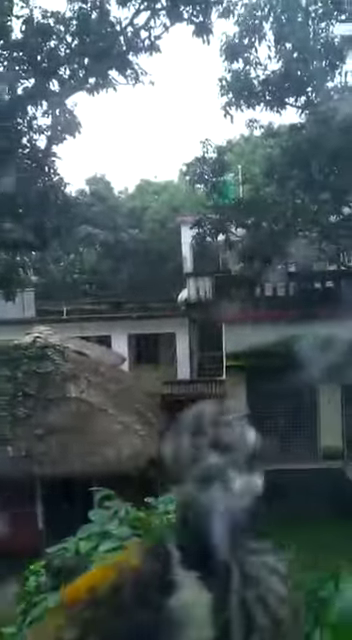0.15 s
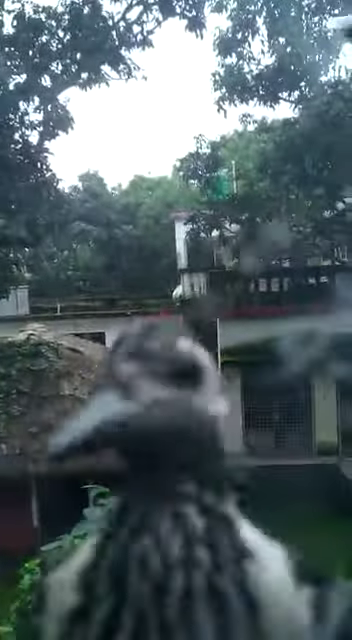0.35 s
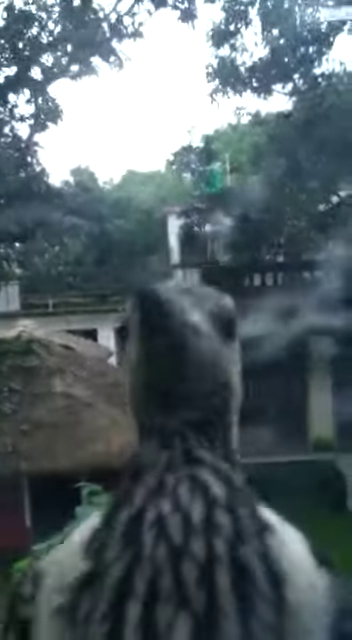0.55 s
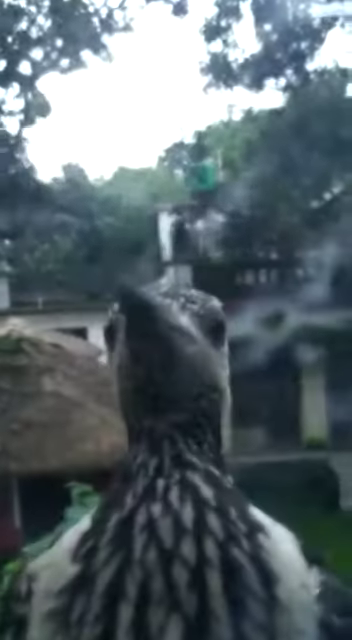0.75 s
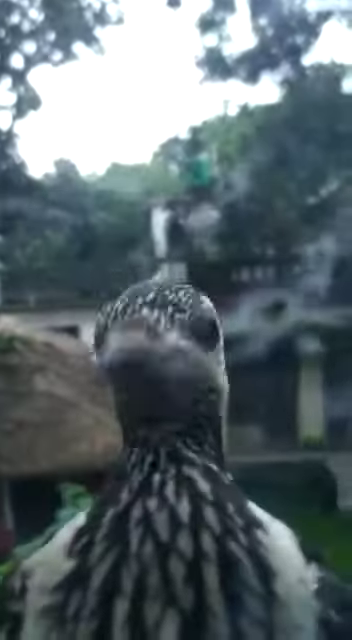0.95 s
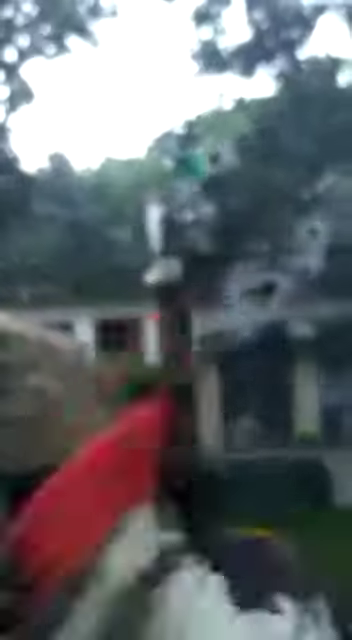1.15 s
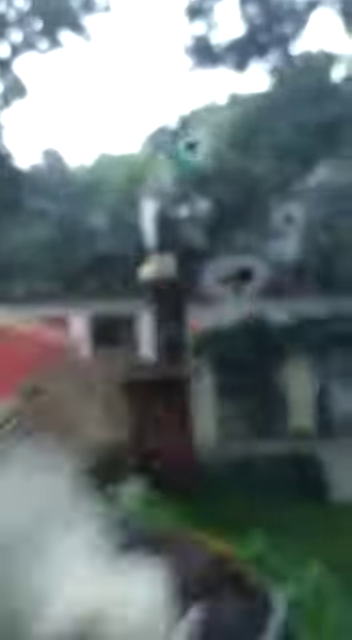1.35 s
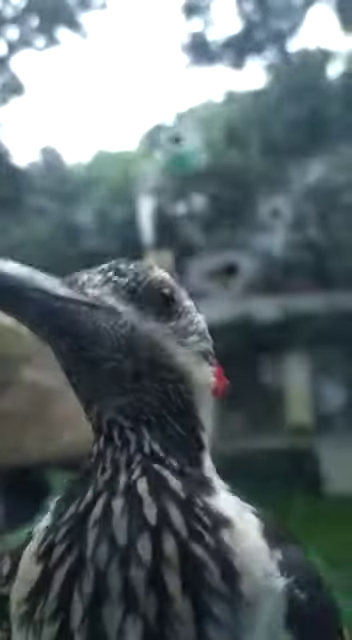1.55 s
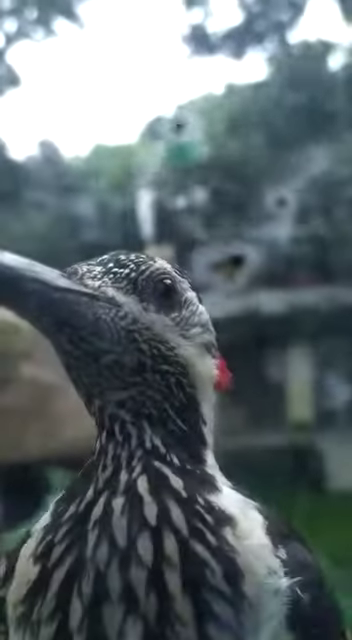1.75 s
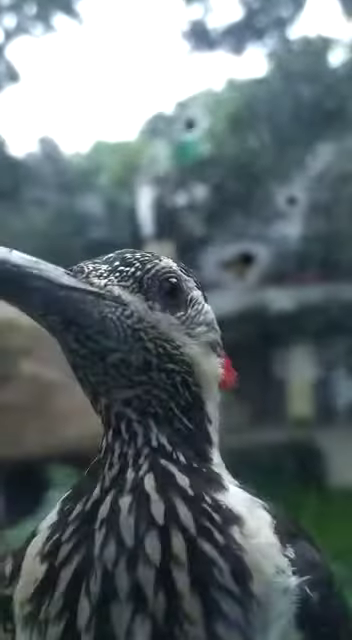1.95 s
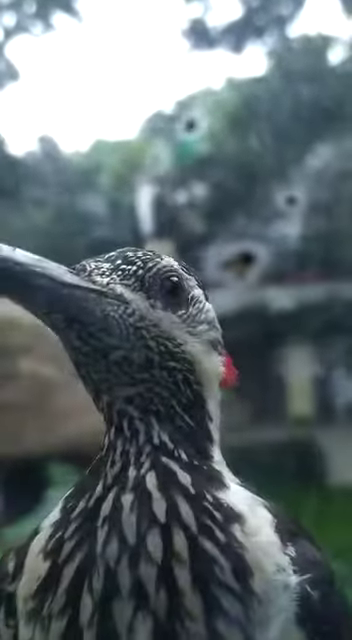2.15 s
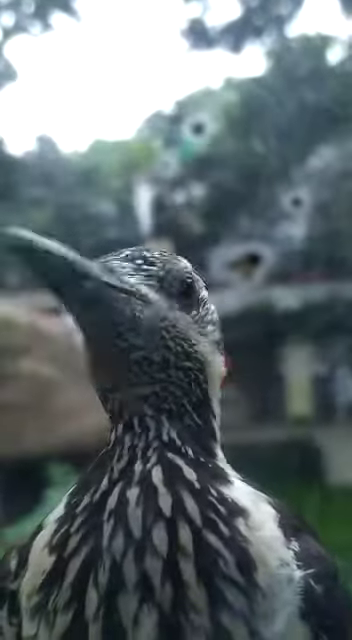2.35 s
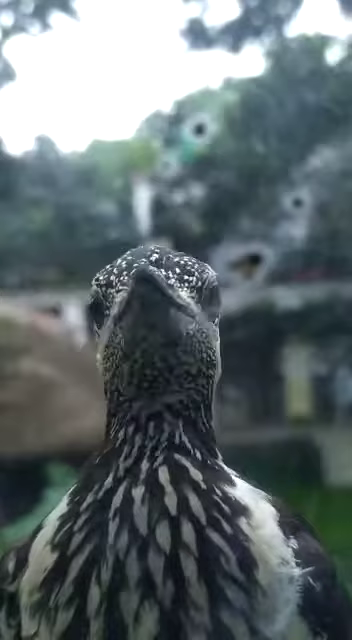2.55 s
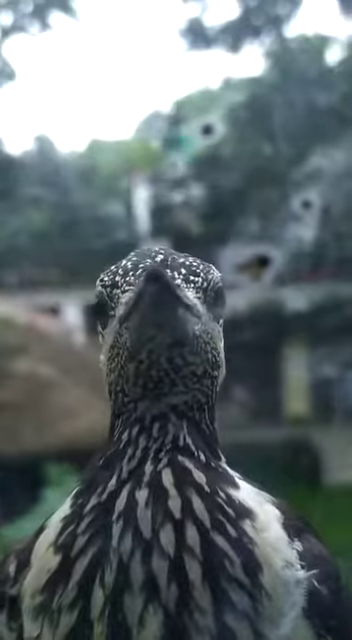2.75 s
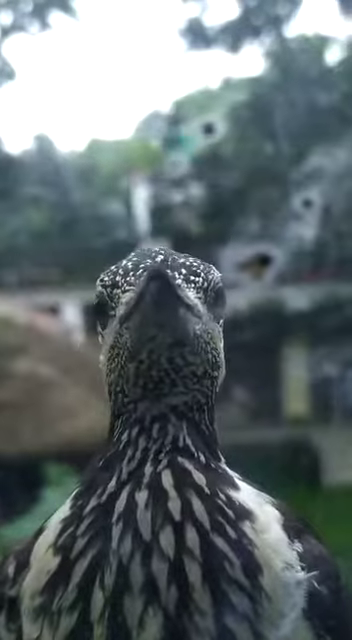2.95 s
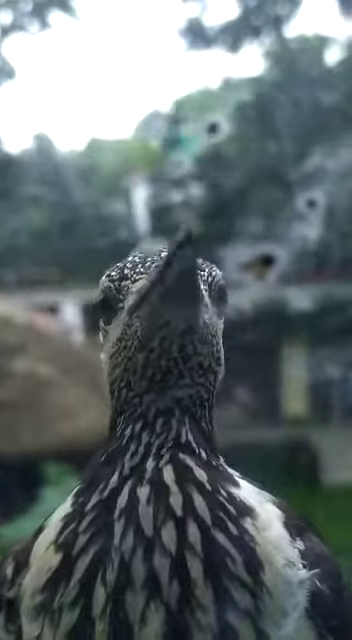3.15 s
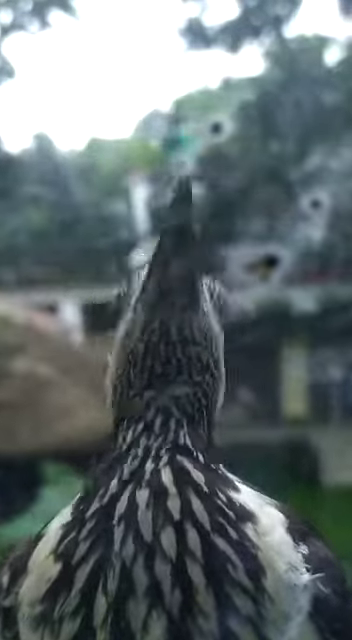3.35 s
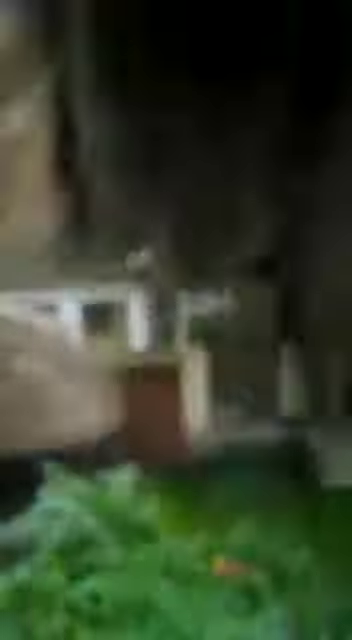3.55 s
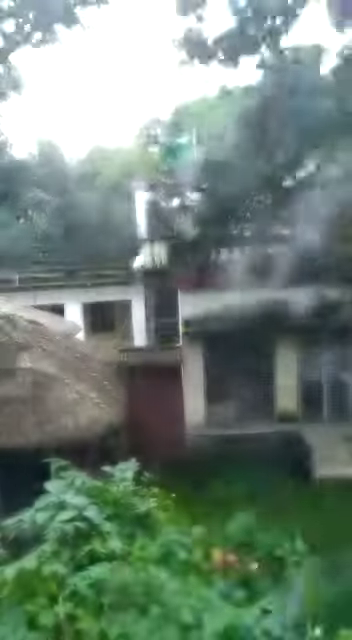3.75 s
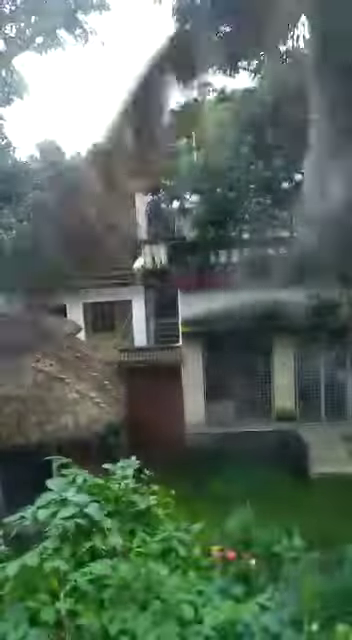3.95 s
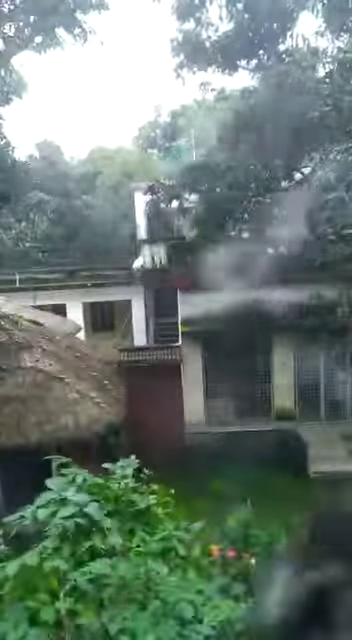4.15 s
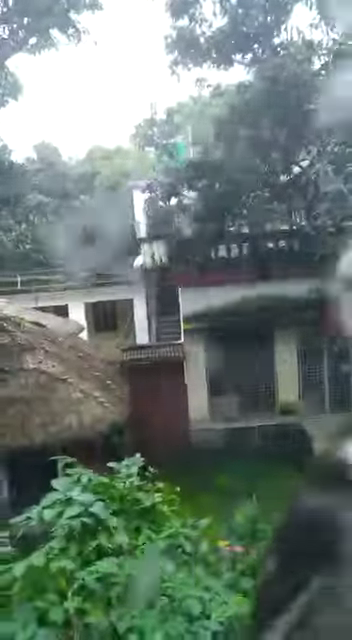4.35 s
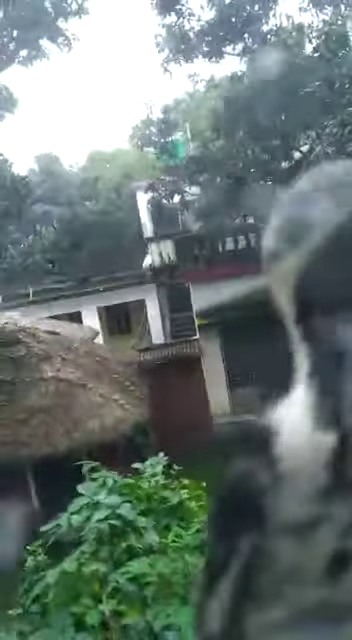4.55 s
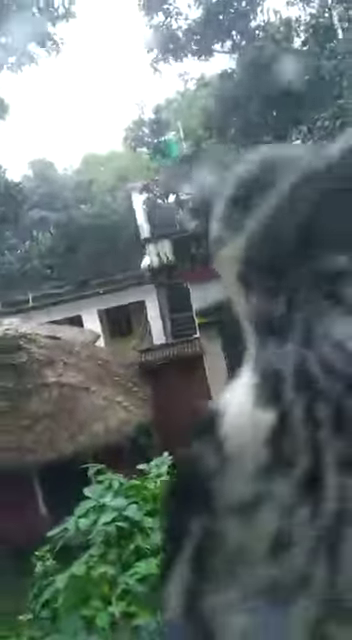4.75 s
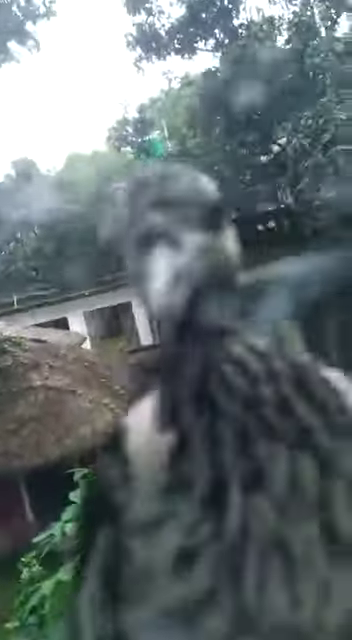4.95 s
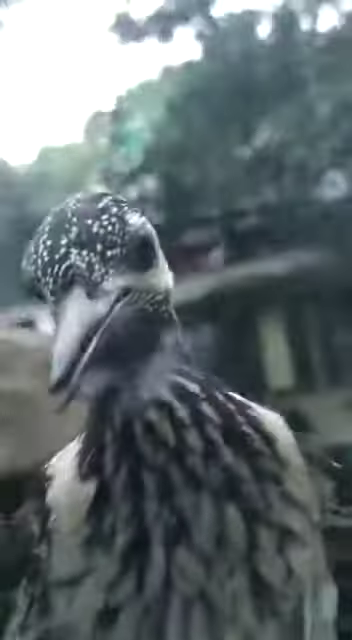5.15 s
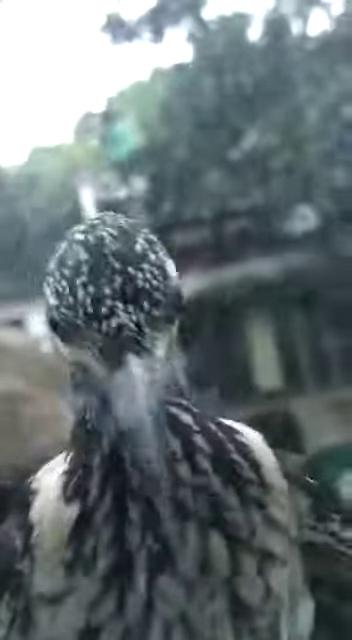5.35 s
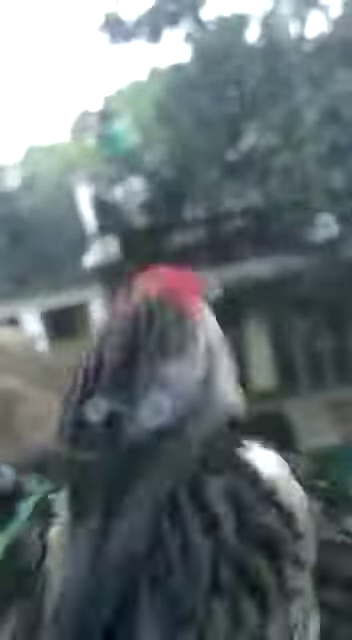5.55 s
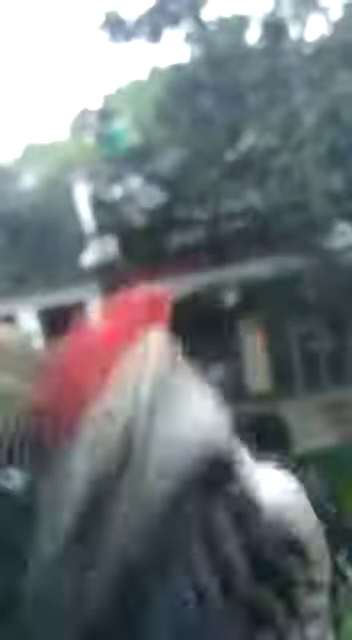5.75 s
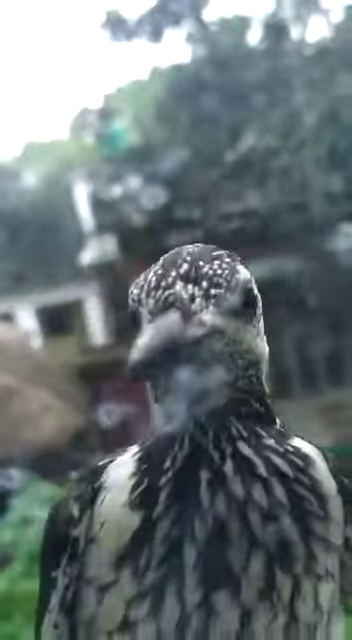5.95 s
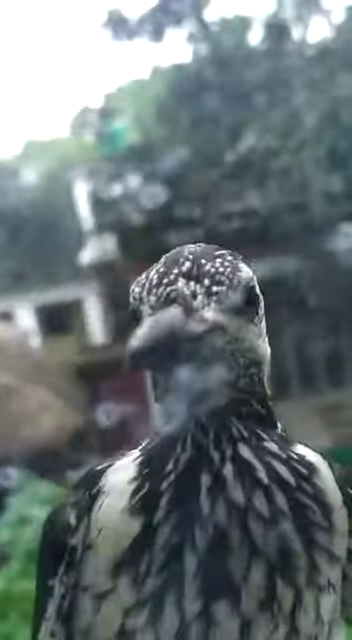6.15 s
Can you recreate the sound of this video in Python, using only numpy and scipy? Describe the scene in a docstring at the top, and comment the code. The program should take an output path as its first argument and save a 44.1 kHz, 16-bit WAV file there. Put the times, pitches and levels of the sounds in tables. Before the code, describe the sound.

Close to a window, heard from inside a bare, reverberant room, a woodpecker raps the glass: a quick pair amid claw scratches, a softer tap, then another firm burst. A quiet stretch follows with faint insects and low hum. Then wings brush, claws scrabble, and two of the loudest knocks ring out before faint scratching and a last light pair.

```python
"""A woodpecker outside a window knocks on the glass and scrabbles with claws and wings on sill and frame.
Close by, decaying modes make the pane ring, a low sine thumps the frame and noise bursts make crack and claws.
The bare room behind the microphones answers with tails of sparse random taps.
From the yard come steady coloured noise for air, insects and rumble, and wavering tones for a cricket,
a far whistle and a low climbing hum; a soft hiss swells late on."""
import sys
import numpy as np
from scipy import signal
from scipy.fft import rfft, irfft
from scipy.io import wavfile
from scipy.ndimage import uniform_filter1d

SR = 44100
rng = np.random.default_rng(int(sys.argv[2]) if len(sys.argv) > 2 else 0)


def file_out(sig):
    """Save sig as 16-bit WAV at sys.argv[1]."""
    # one column per channel
    cols = np.atleast_2d(sig).T
    # limit, then scale
    lim = np.clip(cols, -1, 1)
    pcm = np.round(lim * 32767).astype(np.int16)
    wavfile.write(sys.argv[1], SR, pcm)


def undo_db(level):
    """Turn decibels back into plain size, where 20 dB means ten times bigger."""
    steps = np.asarray(level, float) / 20
    return 10 ** steps


N = 273861  # samples

# beak and body on the pane: start_s, ring_peak_db (before the bass cut), thump_db (3 dB are added later),
# crack_db (rms of its first 10 ms), contact_ms
KNOCKS = [(0.3101, -19, -51, -37.5, 0.39), (.327, -29.5, -45, -42.5, 0.85), (0.583, -34.5, -62, -62, 0.38),
          (1.155, -17.5, -47, -33, 2.1), (1.4300, -17, -90, -35, 1.54), (1.4580, -14.5, -41.5, -27, 1.7),
          (3.593, -36, -49, -39, 1.9), (3.6839, -35, -57, -39.5, 0.72), (3.7115, -28, -38, -35, 0.88),
          (3.9088, -6, -27.5, -25, 0.42), (4.0338, -12, -33.5, -26, 0.31), (5.6064, -24, -50.5, -39, 1.3),
          (5.8042, -24, -55.5, -35.5, 1.67), (5.8429, -43, -56, -44, 0.89)]
# claws on sill and frame: start_s, level_db (12 dB above the rms of the first 10 ms, before panning),
# centre_hz, width_octaves, t60_s (scaled across the band)
SCRATCHES = [(0.1997, -37, 3720, 1.27, 0.1), (0.376, -13, 7140, 1.22, 0.054),
             (0.4536, -23.5, 3400, 0.8, 0.08), (0.557, -26.5, 4600, 1.07, 0.045),
             (0.7158, -40, 3520, 1.9, 0.033), (1.1105, -20, 7500, 1.5, 0.043),
             (1.1258, -28, 4370, 1.3, 0.038), (1.3477, -40, 8450, 1.0, 0.043),
             (3.462, -39, 9200, 3.3, 0.05), (3.5606, -32, 1500, 0.6, 0.024), (3.579, -20, 1690, 0.9, 0.04),
             (3.5905, -24, 6300, 0.98, 0.05), (3.618, -31, 2780, 0.47, 0.025),
             (3.7097, -18, 5500, 1.25, 0.086), (3.7247, -13.5, 7640, 0.9, 0.039),
             (4.0773, -6.5, 3930, 1.12, 0.032), (4.4996, -39, 8455, 2.1, 0.05),
             (4.5723, -40, 3857, 1.3, 0.1), (4.9103, -41, 3000, 2.5, 0.057), (5.033, -39, 5500, 0.9, 0.017),
             (5.29, -47, 2200, 0.5, 0.04), (5.402, -46, 2300, 0.6, 0.04), (5.858, -39, 1980, 2.0, 0.045)]
# modes of pane and frame: pitch_hz, level_db (relative, before contact and dent), t60_s
PANE_MODES = [(134.6, -11.5, 1.4), (166.9, -6.5, 2.33), (177, -2.5, 1.32), (297.8, -2, 0.3), (325, 3, 0.19),
              (385, -14.5, 0.15), (431, -3, 0.18), (479, -5, 0.29), (526.5, -7, 0.09), (629, 5, 0.027),
              (709, -5.5, 0.23), (850, -35, 0.091), (879, -35.5, 0.052), (956, -7.5, 0.097),
              (980, -26, 0.066), (1135, -2, 0.08), (1367, -5, 0.066), (1483, -28, 0.36), (1520, -39, .08),
              (1790, -4.5, 0.036), (180.1, 4, 0.51), (495.5, -6.5, 0.34)]
# colour of the crack: pitch_hz, level_db (relative)
CRACK_COLOUR = [(590, -32), (1000, -11.5), (1710, -2), (2590, -2.5), (2840, 0.5), (4410, -4.5),
                (4960, -5.5), (7980, -6.5), (10400, -14), (16000, -27)]
# decay of the crack: pitch_hz, t60_s
CRACK_DECAY = [(800, 0.062), (3000, 0.047), (8000, 0.037), (16000, 0.076)]
# decay of the bare room: pitch_hz, t60_s
ROOM_DECAY = [(60, 2.7), (200, 1.08), (500, 1.076), (1200, 1.2), (3000, 0.85), (7000, 0.64), (14000, 0.5)]
# left-right likeness of the yard noise: pitch_hz, likeness (-1 to 1)
YARD_LIKENESS = [(60, 0.89), (180, 0.93), (550, 0.7), (1650, 0.048), (4970, 0.022), (15000, 0.014)]
# left-right likeness of the room tails: pitch_hz, likeness (0 to 1)
ROOM_LIKENESS = [(60, 0.57), (180, 0.9), (550, 0.74), (1650, 0.0), (4970, 0), (15000, 0.18)]
# window side of the microphones: pitch_hz, left_minus_right_db
WINDOW_SIDE = [(60, -4.5), (180, -0.5), (550, -1), (1650, 2), (4970, 1.5), (15000, -3)]
# where the claws grip: time_s, left_minus_right_db
PERCH = [(0.2, 1.5), (1.3, 0), (3.46, 5), (3.56, -6), (3.6, 1), (4.1, 1.5), (5.0, 5), (5.9, 1)]
# colour of the air outside: pitch_hz, level_db (relative)
AIR_COLOUR = [(120, -25), (200, -10), (438, -6.5), (519, -16), (640, -7), (905, -18.5), (1500, -21.5),
              (1950, -62), (3300, -120)]
# colour of the far insect chorus: pitch_hz, level_db (relative)
INSECT_COLOUR = [(880, -21), (1500, -16.5), (1710, -17.5), (1860, -10), (2120, -14.5), (3340, -12.5),
                 (3870, -7), (4730, -18.5), (5930, -8), (8180, -13), (9410, -4.5), (10400, 3),
                 (11000, -7.5), (12000, -109), (15600, -94), (22000, -120)]
# colour of the low rumble: pitch_hz, level_db (relative)
RUMBLE_COLOUR = [(15, -45), (25, -24), (43, -0.5), (64, -11.5), (91, 2), (123, -13), (151, -1), (168, -3),
                 (194, -14.5), (300, -23), (390, -19.5), (660, -120)]
# steady part of the rumble: time_s, rms_db
RUMBLE_LEVEL = [(0, -60), (2.5, -55.5), (4.5, -59), (6.21, -62)]
# long cricket notes: top_s, top_rms_db
CHIRPS = [(.17, -61), (.76, -61)]
# far and faint whistle: time_s, pitch_hz, rms_db
WHISTLE = [(.85, 1927, -67), (1.75, 1854, -72), (2.0, 1868, -68.5), (2.13, 2090, -67), (2.25, 2046, -81)]
# feathers brush the frame, one stroke a row: top_s, top_rms_db
FEATHER_STROKES = [(.4, -44), (.56, -58), (3.49, -52), (3.61, -38), (3.75, -41), (5.797, -42.5),
                   (5.865, -53.5)]
# colour of the brushing: pitch_hz, level_db (relative)
FEATHER_COLOUR = [(500, -19), (1200, -1), (3000, -2), (7000, -6), (12000, -18), (16000, -15)]
# swell of the low hum: top_rms_db, rise_db_per_s, fall_db_per_s
HUM_SWELL = (-52, 16.5, 81)
# swell of the soft hiss: top_rms_db, rise_db_per_s, fall_db_per_s
RUSTLE_SWELL = (-61, 10, 30)


def evened(x):
    """Scales to rms 1."""
    return x / np.sqrt(np.mean(x ** 2) + 1e-20)


def start_rms(sound):
    """Rms of the first 10 ms."""
    return np.sqrt(np.mean(sound[:, :441] ** 2))


def read(points, hz):
    """Looks a curve up on a log-frequency axis."""
    f, value = np.transpose(points)
    return np.interp(np.log(hz + 1), np.log(f + 1), value)


def add(mix, s, sound):
    """Mixes a sound in at time s."""
    part = mix[:, round(s * SR):][:, :sound.shape[1]]
    part += sound[:, :part.shape[1]]


def swell(s, top_db, rise_db_per_s, fall_db_per_s):
    """A gain that climbs to its top at time s and falls away."""
    t = np.arange(N) / SR - s
    return undo_db(top_db - np.where(t < 0, -rise_db_per_s * t, fall_db_per_s * t))


def field(spectrum, size, patchy_db):
    """Steady two-channel noise of rms 1 with drifting patches in time and frequency."""
    frames, hz = 4 * N // size + 5, np.fft.rfftfreq(size, 1 / SR)
    a, b, c, d, patches = rng.standard_normal((frames, len(hz), 5)).T
    patches = uniform_filter1d(patches, size=9, axis=0)
    patches = evened(uniform_filter1d(patches, size=9, axis=1))
    same = np.clip(read(YARD_LIKENESS, hz), -1, 1)[:, None]
    left = a + 1j * b
    right = same * left + np.sqrt(1 - same ** 2) * (c + 1j * d)
    z = np.array([left, right]) * undo_db(read(spectrum, hz)[:, None] + patchy_db * patches)
    return evened(signal.istft(z, nperseg=size, noverlap=3 * size // 4)[1][:, :N])


def fuzzy_tone(hz, level, width_hz, steady):
    """A narrow wavering tone along a pitch curve: a fixed part plus slow random drift."""
    r = np.exp(-np.pi * width_hz / SR)
    noise = rng.standard_normal((2, N)) + 1j * rng.standard_normal((2, N))
    drift = signal.lfilter([1], [1, -r], noise)
    carrier = np.exp(2j * np.pi * np.cumsum(hz * np.ones(N)) / SR)
    return level * evened(((steady + drift / np.std(drift)) * carrier).real)


def burst(noise, gain, t60, rise_s):
    """Many short modes at once: coloured noise, each band dying at its own speed."""
    count = noise.shape[1]
    coloured = irfft(rfft(noise) * gain(np.fft.rfftfreq(count, 1 / SR)))
    hz, t, z = signal.stft(coloured, SR, nperseg=128)
    decay = undo_db(-60 * t / np.maximum(t60(hz), 1e-3)[:, None])
    dying = signal.istft(z * decay, SR, nperseg=128)[1][:, :count]
    rise = 1 - np.exp(-(np.arange(count) / SR / max(rise_s, 1e-5)) ** 2)
    return dying * rise * np.hanning(2 * count)[count:]


def pair(noise, like):
    """Left and right hear partly the same modes."""
    return np.array([noise[0], like * noise[0] + np.sqrt(1 - min(like, 1) ** 2) * noise[1]])


def air():
    """Air outside: dull steady noise."""
    return undo_db(-69) * field(AIR_COLOUR, size=512, patchy_db=2.0)


def insects():
    """Far insect chorus: steady hiss with bands of its own."""
    return undo_db(-56.5) * field(INSECT_COLOUR, size=512, patchy_db=2.0)


def rumble():
    """Low noise from the yard, joined in power by a shudder about each frame thump."""
    t = np.arange(N) / SR
    steady = undo_db(np.interp(t, *np.transpose(RUMBLE_LEVEL)))
    # each shudder tops out 13.5 dB under the thump column
    shudder_power = sum(swell(row[0], row[2] - 13.5, rise_db_per_s=2000, fall_db_per_s=24.5) ** 2
                        for row in KNOCKS)
    return np.sqrt(steady ** 2 + shudder_power) * field(RUMBLE_COLOUR, size=4096, patchy_db=0.0)


def cricket():
    """Long cricket notes: one fuzzy pitch that swells and fades."""
    level = sum(swell(s, db, rise_db_per_s=35, fall_db_per_s=40) for s, db in CHIRPS)
    return fuzzy_tone(3410, level, width_hz=51, steady=0.83)


def scratch(row, noise):
    """A grainy bright claw slip: a noise band about its centre with a rise of a few ms."""
    s, db, centre_hz, octaves, t60_s = row
    pan_db = np.interp(s, *np.transpose(PERCH))
    pan = undo_db(np.array([[pan_db], [-pan_db]]) / 2)
    grains = noise[:2] * (0.7 + abs(uniform_filter1d(noise[2], size=30)) * 4)
    band = lambda f: np.exp(-.4 * abs(np.log2((f + 1) / centre_hz) / octaves) ** 3)
    decay_s = lambda f: t60_s * (centre_hz / (f + 300)) ** 0.21
    slip = burst(pair(grains, 0.04), band, decay_s, rise_s=0.002)
    return s - .0012, undo_db(db) * slip / start_rms(slip) / 4 * pan


def room(ring, noisy):
    """Bare room: three tails of sparse random taps, each band dying at its own speed, low bands more alike."""
    size, first = 3 * SR // 2, 220  # samples; nothing returns in the first 5 ms
    taps = np.zeros((6, size))
    at = np.arange(first, size - 20, 20) + rng.integers(0, 20, (6, (size - 221) // 20))
    np.put_along_axis(taps, at, rng.choice([-1., 1.], at.shape), 1)
    hz, t, z = signal.stft(taps, SR, nperseg=512)
    same = np.clip(read(ROOM_LIKENESS, hz), 0, 1)[:, None]
    z = np.array([z[:3], same * z[:3] + np.sqrt(1 - same ** 2) * z[3:]])
    tails = signal.istft(z * undo_db(-60 * t / read(ROOM_DECAY, hz)[:, None]), SR, nperseg=512)[1]
    tails = tails * (np.arange(tails.shape[-1]) > first) / np.linalg.norm(tails[0, 0])
    # the slowest modes reach the microphones directly
    upper = signal.sosfilt(signal.butter(2, 210, "high", fs=SR, output="sos"), ring.mean(0))
    # the noisy sounds feed the three tails in turn, at constant total power
    phase = np.pi * (np.arange(N) / SR * 90 + np.arange(3)[:, None] / 3)
    feeds = np.cos(phase) * np.sqrt(2 / 3) * noisy.mean(0)
    feeds[0] += upper
    return signal.fftconvolve(feeds[None], tails, axes=2)[..., :N].sum(1)


def pane_ring(db, thump_db, contact_ms):
    """Pane modes struck together and dying apart; a shorter contact excites more of the high ones."""
    t = np.arange(3 * SR // 2) / SR
    hz, mode_db, t60_s = np.transpose(PANE_MODES)[:, :, None]
    # a blow with more weight behind it thumps the frame and swings the slowest modes
    swing = undo_db((3 + 0.34 * (thump_db - db)) * (hz < 230))
    soft = 1 / (1 + (hz * contact_ms / 1000) ** 3.9)
    # the first wave is strong, then spreads over the glass
    dent = 1 + 0.81 * (hz / 400) ** 0.89 * np.exp(-t / 0.008)
    # each mode reaches the two microphones a little apart (radians)
    turn = 0.22 * np.sqrt(hz / 300) * (-1) ** np.arange(len(hz))[:, None]
    lag = 0.13 * np.sqrt(hz / 300)  # radians: bending waves spread the arrival
    modes = swing * soft * dent * undo_db(mode_db - 60 * t / t60_s)
    ring = np.array([(modes * np.sin(2 * np.pi * hz * t - lag + side * turn)).sum(0) for side in (-1, 1)])
    ring *= (1 - np.exp(-t / 0.00019)) * undo_db(db) / abs(ring).max()
    # a small pane pushes little deep bass
    return signal.sosfilt(signal.butter(2, 110, "high", fs=SR, output="sos"), ring)


def frame_thump(thump_db):
    """The frame gives one low decaying sine with a soft start."""
    t = np.arange(3 * SR // 2) / SR
    hz, t60_s = 65.84, 0.76
    envelope = undo_db(-60 * t / t60_s) * (1 - np.exp(-t / 0.0054))
    return 1.41 * undo_db(thump_db) * envelope * np.sin(2 * np.pi * hz * t)


def crack(crack_db, noise):
    """The bright crack of contact: a burst of noise, nearly unlike left and right."""
    colour = lambda f: undo_db(read(CRACK_COLOUR, f))
    decay_s = lambda f: read(CRACK_DECAY, f)
    sound = burst(pair(noise, 0.057), colour, decay_s, rise_s=0.0002)
    return undo_db(crack_db) * sound / start_rms(sound)


def woody_frame(db, contact_ms, noise):
    """Close modes of the frame blur into a woody knock, duller for a longer contact."""
    def colour(f):
        hump = (f / 600) ** 1.09 / (1 + (f / 600) ** 2.58)
        return hump / (1 + (f * contact_ms / 1000) ** 5.2)
    decay_s = lambda f: 0.18 * (500 / (f + 100)) ** .4
    sound = burst(pair(noise[:, ::-1], 0.2), colour, decay_s, rise_s=0.0011)
    return undo_db(db - 16.5) * sound / start_rms(sound)


def knock(row, noise):
    """One blow on the glass sets off pane ring, frame thump, crack and woody knock together."""
    s, db, thump_db, crack_db, contact_ms = row
    out = pane_ring(db, thump_db, contact_ms) + frame_thump(thump_db)
    out[:, :noise.shape[1]] += crack(crack_db, noise)
    out[:, :noise.shape[1]] += woody_frame(db, contact_ms, noise)
    return s, out


def feathers():
    """Wing feathers on the frame: uneven grainy noise under short strokes."""
    level = sum(swell(s, db, rise_db_per_s=630, fall_db_per_s=384) for s, db in FEATHER_STROKES)
    grain = undo_db(2.2 * evened(uniform_filter1d(rng.standard_normal(N), size=120)))
    return level * evened(grain * field(FEATHER_COLOUR, size=256, patchy_db=4.5))


def whistle():
    """A far whistle: a fuzzy tone sliding along its pitch curve."""
    t = np.arange(N) / SR
    s, hz, db = np.transpose(WHISTLE)
    level = undo_db(np.interp(t, s, db, -120, -120))
    return fuzzy_tone(np.interp(t, s, hz), level, width_hz=81.0, steady=0.22)


def hum():
    """A low hum climbs 11 Hz a second, swells and falls off fast, the same in both channels."""
    t = np.arange(N) / SR
    top_s = 2.7
    pitch_hz = 93.4 + 11 * (t - top_s)
    return fuzzy_tone(pitch_hz, swell(top_s, *HUM_SWELL), width_hz=1.7, steady=3.03)[[0, 0]]


def rustle():
    """A soft noise hiss near 4 kHz swells and fades."""
    colour = [(2500, -34), (3300, -1.0), (4000, 6), (5500, -11)]  # pitch_hz, level_db (relative)
    return swell(5.2, *RUSTLE_SWELL) * field(colour, size=512, patchy_db=0.5)


def scene():
    """Bird at the window, the room behind the microphones, the yard outside."""
    pane, sill = np.zeros((2, N)), np.zeros((2, N))
    for row, noise in zip(KNOCKS, rng.standard_normal((len(KNOCKS), 2, 8192))):
        add(pane, *knock(row, noise))
    for row, noise in zip(SCRATCHES, rng.standard_normal((len(SCRATCHES), 3, 8192))):
        add(sill, *scratch(row, noise))
    sill += feathers()
    window = pane + sill + room(undo_db(-7.5) * pane, undo_db(-8.5) * sill)
    side_db = read(WINDOW_SIDE, np.fft.rfftfreq(N, 1 / SR)) / 2
    placed = irfft(rfft(window) * undo_db(np.array([side_db, -side_db])), N)
    yard = air() + insects() + rumble() + cricket() + whistle() + hum() + rustle()
    return placed + yard


def top_cut(x):
    """Nothing passes above the cut-off."""
    return signal.sosfilt(signal.butter(12, 16460, fs=SR, output="sos"), x)


def record(dry):
    """Small microphones lose the deepest bass and the top octave."""
    low_cut = signal.sosfilt(signal.butter(4, 38, "high", fs=SR, output="sos"), dry)
    finished = signal.sosfilt(signal.butter(2, 11000, fs=SR, output="sos"), low_cut)
    return top_cut(finished)


dry = scene()
out = record(dry)
file_out(out)
```